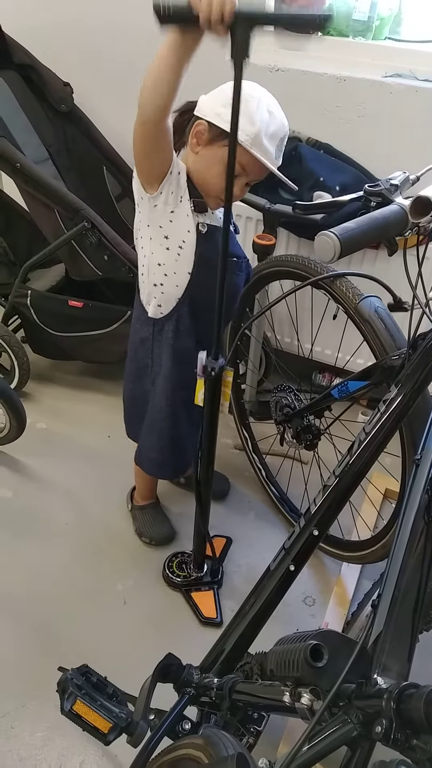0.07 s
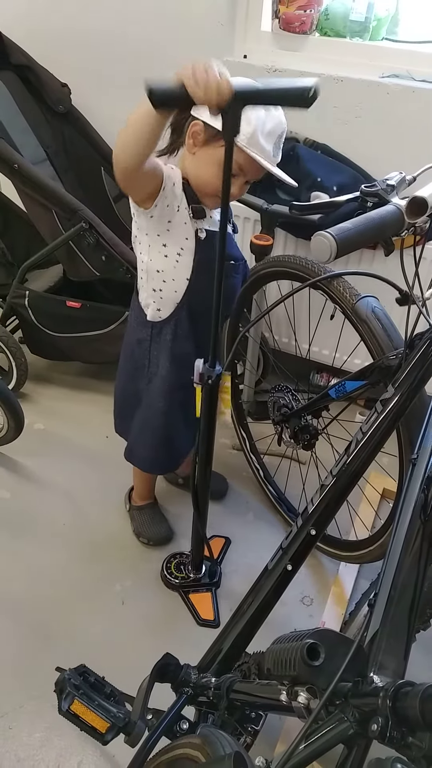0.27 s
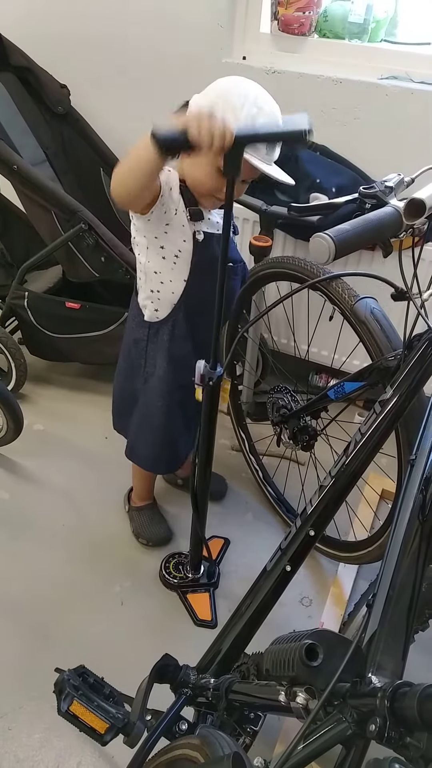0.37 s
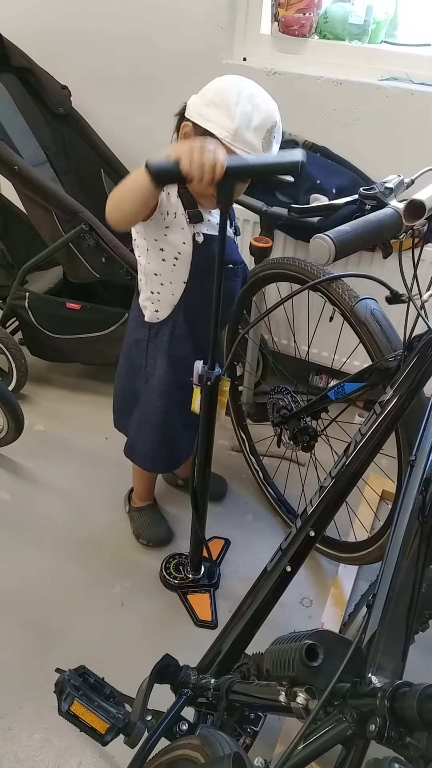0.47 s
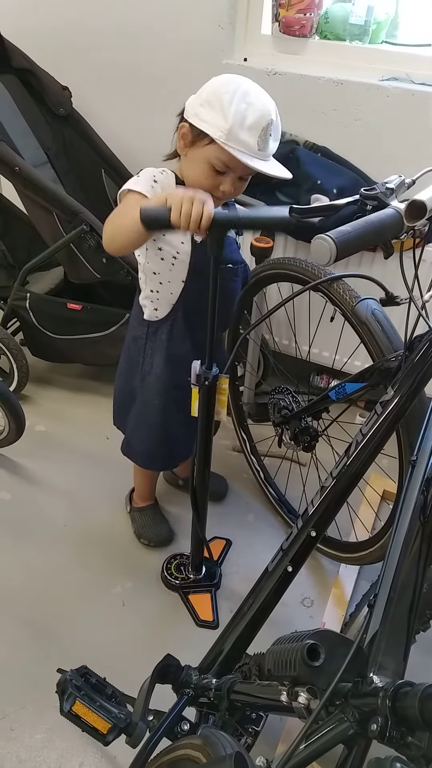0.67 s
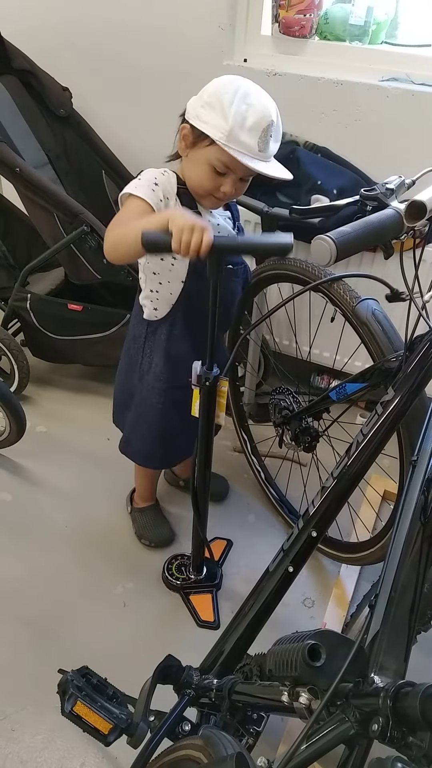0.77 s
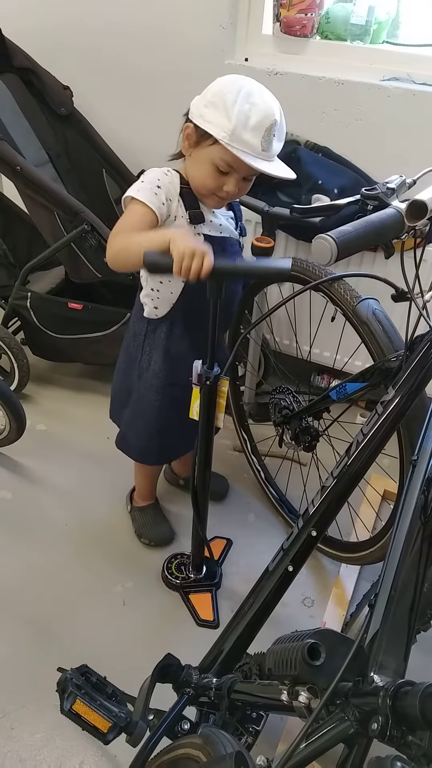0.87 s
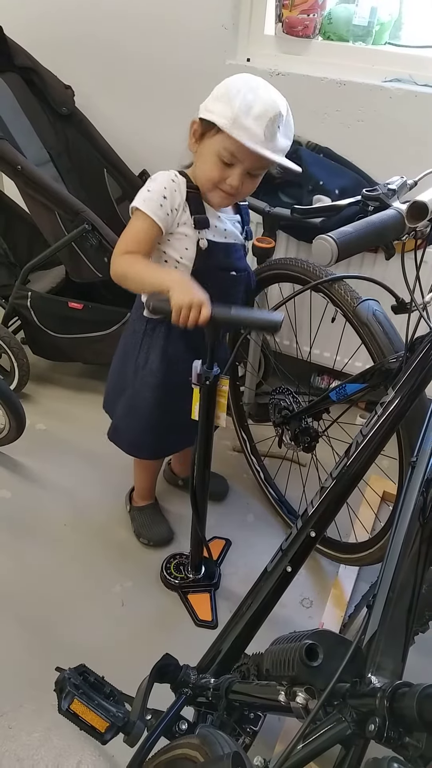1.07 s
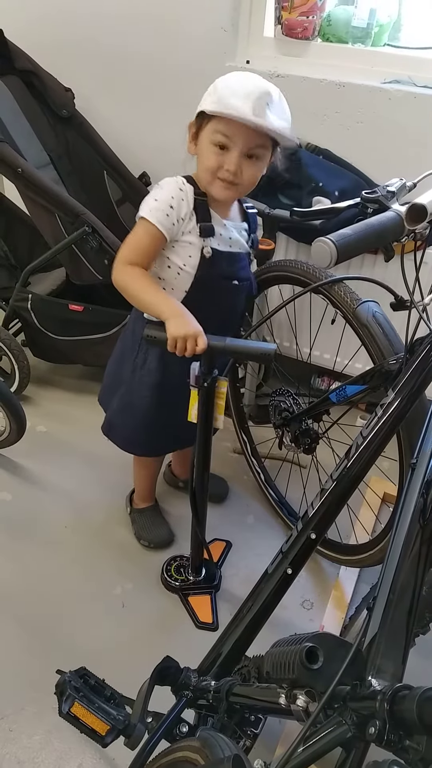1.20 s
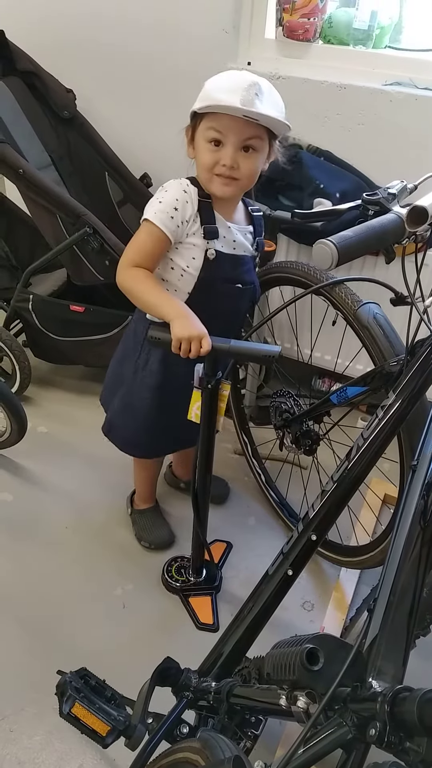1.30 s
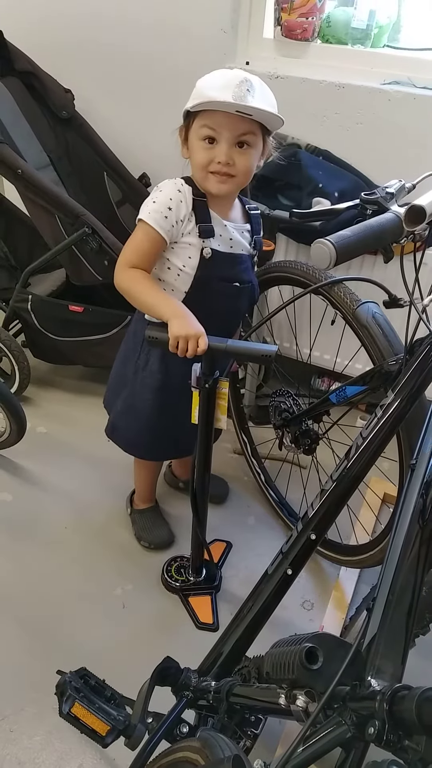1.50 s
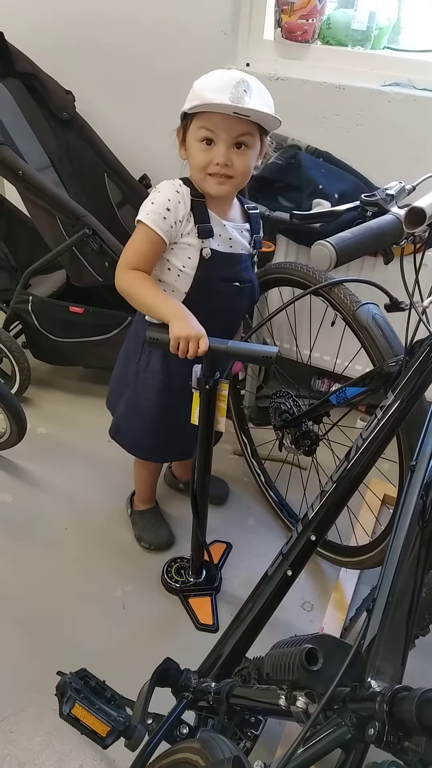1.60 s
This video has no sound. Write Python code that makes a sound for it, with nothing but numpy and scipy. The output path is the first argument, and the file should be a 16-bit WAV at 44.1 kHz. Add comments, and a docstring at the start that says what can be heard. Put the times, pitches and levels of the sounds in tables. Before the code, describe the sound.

One slow bicycle pump downstroke: bright airy hiss, loose rod clatter early, soft landing at the end

```python
"""Air hisses on the right for one slow downstroke of a floor bicycle pump in a small hard-walled room.
The hiss is shaped noise with faint whistles; mostly early on, the loose rod knocks as struck modes
and clatter in the ringing barrel. The sliding piston rubs as rough noise and hums as a gliding sine,
over a low noise rumble and dull noise thuds, the last as the piston lands softly."""
import sys
import numpy as np
from scipy import signal
from scipy.fft import rfft, irfft
from scipy.io import wavfile

SR = 44100
rng = np.random.default_rng(int(sys.argv[2]) if len(sys.argv) > 2 else 0)


def unload_audio(sound):
    """Save the sound as a 16-bit wav file, at the path given as the first command line argument."""
    columns = np.transpose(np.atleast_2d(sound))
    # keep every value between -1 and 1, then stretch to whole-number steps
    steps = np.round(np.clip(columns, -1, 1) * 32767)
    wavfile.write(sys.argv[1], SR, steps.astype(np.int16))


N = 72765
T = np.arange(N) / SR  # time [s]


def from_db(db):
    """Decibels to gain."""
    return 10 ** (np.asarray(db) / 20)


def rms_one(x):
    """Scale each channel to rms 1."""
    return x / np.sqrt(np.mean(x ** 2, axis=-1, keepdims=True) + 1e-20)


def in_time(rows):
    """Join the rows of a curve by straight lines."""
    s, *columns = np.transpose(rows)
    return [np.interp(T, s, c) for c in columns]


def level(rows):
    """Gain of a level curve."""
    return from_db(in_time(rows)[0])


def during(rows):
    """Gate that is open between the first and last times of a curve."""
    return (T > rows[0][0]) * (T < rows[-1][0])


def pan(db):
    """Left and right gains for a left-minus-right level difference."""
    return from_db(np.array([[db], [-db]]) / 2)


def coloured(spectrum):
    """Noise with the given spectrum, rolled off beyond its ends, rms 1."""
    hz, db = np.transpose(spectrum)
    f = np.maximum(np.arange(N // 2 + 1) * SR / N, 1)
    gain = from_db(np.interp(np.log(f), np.log(hz), db))
    above = 1 + (f / (2 * hz[-1])) ** 6
    below = 1 + (hz[0] / (2 * f)) ** 6
    gain /= np.sqrt(above * below)
    return rms_one(irfft(rfft(rng.standard_normal(N)) * gain, N))


def stereo_noise(spectrum, likeness):
    """Two channels of noise that share a part: likeness 0 is separate, 1 is identical."""
    shared = coloured(spectrum)
    separate = np.array([coloured(spectrum), coloured(spectrum)])
    return np.sqrt(likeness) * shared + np.sqrt(1 - likeness) * separate


def drift(hz):
    """Slow random motion, spread 1: noise through a two-pole lowpass that has already settled."""
    r = np.exp(-2 * np.pi * hz / SR)
    return rms_one(signal.lfilter([1], [1, -2 * r, r * r], rng.standard_normal(2 * N))[N:])


def dying(start, t60):
    """Envelope that jumps to 1 and falls 60 dB in t60 seconds."""
    return (T >= start) * np.exp(-np.log(1000) * np.maximum(T - start, 0) / t60)


def ring(start, hz, t60):
    """A struck mode: a sine with a quick rise and an exponential decay."""
    rise_s = .0008
    age = np.maximum(T - start, 0)
    return (1 - np.exp(-age / rise_s)) * dying(start, t60) * np.sin(2 * np.pi * hz * age)


def in_room(x, wet_db):
    """Add a diffuse noise tail, different at each ear, whose top dies sooner."""
    t60_s, treble_t60_s, treble_hz, gap_s = 0.43, .3, 8720, .004
    white = rng.standard_normal((2, N))
    low = signal.sosfilt(signal.butter(6, treble_hz, "low", fs=SR, output="sos"), white)
    high = signal.sosfilt(signal.butter(6, treble_hz, "high", fs=SR, output="sos"), white)
    decay = dying(gap_s, t60_s)
    tail = low * decay + high * dying(gap_s, treble_t60_s)
    tail /= np.sqrt(np.sum(decay ** 2))
    return x + from_db(wet_db) * signal.fftconvolve(x, tail, axes=-1)[:, :N]


def rumble():
    """Low noise from the pump's body lies under the stroke."""
    # rumble of the body: (time [s], level [dB])
    rumble_curve = [(.06, -100), (.11, -85), (.22, -81), (.3, -60), (.72, -69), (.85, -60.5), (1.0, -60.5),
                    (1.2, -68), (1.38, -58), (1.48, -70.5), (1.65, -84)]
    # its spectrum: (frequency [Hz], relative density [dB per Hz])
    rumble_spectrum = [(30, -30), (70, -34), (110, -3.5), (150, -1), (220, -11.5), (400, 1.5), (700, -19.5)]
    started = T > rumble_curve[0][0]
    return level(rumble_curve) * started * stereo_noise(rumble_spectrum, likeness=0.86)


def bumps():
    """Dull noise thuds swell and die as the foot rocks on the floor and the piston lands."""
    # bumps of the pump's foot: (time [s], level [dB])
    thuds = [(.25, -60), (.285, -50), (.47, -51), (.65, -57), (1.073, -52), (1.293, -46), (1.335, -58)]
    # their spectrum: (frequency [Hz], relative density [dB per Hz])
    thud_spectrum = [(25, -19.5), (65, -19.5), (115, -6.5), (180, -1.5), (280, -20), (600, -28.5)]
    attack_s, t60_s = 0.017, 0.18
    envelope = 0
    for s, db in thuds:
        attack = np.clip((T - s) / attack_s, 0, 1)
        envelope = envelope + from_db(db) * attack * dying(s, t60_s)
    return envelope * stereo_noise(thud_spectrum, likeness=0.8)


def hum():
    """The sliding piston hums: one sine glides in pitch while its level and pitch waver."""
    # hum: (time [s], pitch [Hz], level [dB])
    hum_curve = [(.58, 354, -62), (.65, 342.9, -66.5), (.72, 330.4, -60), (.79, 340.4, -59),
                 (.87, 273.7, -73), (.97, 278.8, -59.5), (1.08, 322.7, -67), (1.16, 341, -59),
                 (1.21, 367, -56), (1.27, 373.8, -45.5), (1.31, 374.8, -56.5), (1.36, 385, -60)]
    flicker_db, flicker_hz = 2.5, 14
    hz, db = in_time(hum_curve)
    loudness = from_db(db + flicker_db * drift(flicker_hz))
    wavering_hz = hz * (1 + 0.0099 * drift(30))
    tone = np.sqrt(2) * np.sin(2 * np.pi * np.cumsum(wavering_hz) / SR)  # rms 1
    return loudness * tone * during(hum_curve) * pan(1.2)


def rub():
    """The seal rubs down the barrel: nearly mono noise, a little to the right."""
    # rubbing: (time [s], level [dB])
    rub_curve = [(.06, -101.5), (.13, -69), (.228, -52.5), (.245, -38), (.33, -37.5), (.4, -34),
                 (.52, -37.5), (.57, -45.5), (.7, -48.5), (.9, -52.5), (1.1, -50), (1.23, -45.5),
                 (1.3, -42), (1.37, -48.5), (1.45, -64), (1.65, -105)]
    # its spectrum: (frequency [Hz], relative density [dB per Hz])
    rub_spectrum = [(30, -32.5), (65, -44), (120, -12), (200, -14.5), (330, -11), (450, -4), (590, 1.5),
                    (750, -0.5), (1000, 0), (1400, -1.5), (1850, -6.5), (2400, -1.5), (3500, -2),
                    (6000, -23)]
    return level(rub_curve) * stereo_noise(rub_spectrum, likeness=0.99) * pan(-3)


def scrape():
    """The rod scrapes in its guide: bright, wide noise."""
    # scraping: (time [s], level [dB])
    scrape_curve = [(.1, -79), (.25, -41), (.34, -33.5), (.38, -35), (.5, -37), (.57, -38), (.7, -70),
                    (.95, -60), (1.15, -53), (1.29, -39.5), (1.38, -60), (1.45, -79.5)]
    # its spectrum: (frequency [Hz], relative density [dB per Hz])
    scrape_spectrum = [(1500, 5.5), (2500, -26), (5000, 10.5), (7400, 4), (8400, -7), (10500, -8.5),
                       (13000, -31), (15800, -37.5)]
    return level(scrape_curve) * stereo_noise(scrape_spectrum, likeness=0.18) * during(scrape_curve)


def piston():
    """Rubbing and scraping share one uneven grip; the hum runs free of it."""
    rough_db, rough_hz = 1, 60
    grip = from_db(rough_db * drift(rough_hz))
    return grip * (rub() + scrape()) + hum()


def off_axis(x):
    """The sound reaches the right ear a little later."""
    lag_s = .0001
    return np.array([x[0], np.interp(T - lag_s, T, x[1])])


def knocks():
    """Each knock stirs the modes near its brightest pitch, a brief clatter and the barrel's ring."""
    # knocks of the rod in the barrel: (time [s], relative level of modes and clatter [dB],
    # brightest pitch [Hz], spread [octaves], barrel ring [dB], left minus right [dB])
    hits = [(.237, -25.5, 1400, 0.48, -58, -4), (0.238, -27.5, 590, 0.21, -57, -2),
            (.259, -24.5, 1450, 0.54, -44, -0.5), (.335, -16, 560, 0.12, -58, 5),
            (.339, -17.5, 1630, .12, -61.5, 5), (.3725, -13.5, 1557, 0.61, -22, 4),
            (.381, -22, 620, .4, -49, 4), (0.398, -18.5, 1660, 0.15, -57.5, 4.5),
            (.413, -21, 1880, 0.72, -30.5, 5.5), (.432, -26, 1690, 0.69, -54, 13.5),
            (.464, -13.5, 2500, 0.77, -40.5, -2), (.484, -19, 1650, 0.68, -57, 8.5),
            (.488, -14.5, 1540, 0.38, -35.5, 8), (.511, -19.5, 1650, 0.59, -42.5, 6.5),
            (1.306, -30, 1350, 0.17, -66, -8)]
    # short modes of rod and guide: (frequency [Hz], relative level [dB], t60 [s])
    rod_modes = [(575, -1, 0.036), (616, -2, 0.05), (870, -27, 0.14), (964, -6, 0.21), (1170, -8, 0.023),
                 (1363, -1.5, 0.036), (1524, -10.5, 0.044), (1680, -14, 0.11), (1770, -11, 0.047),
                 (2240, -13, .06), (2650, -7, 0.062), (2800, -10, 0.034)]
    # the barrel's beating pair and a weaker mode below: (frequency [Hz], relative level [dB], t60 [s])
    barrel_modes = [(1023, 0, 0.35), (1041, -2.5, 0.24), (958, -19, 0.69)]
    # clatter before its band filter: (frequency [Hz], relative density [dB per Hz])
    clatter_spectrum = [(100, -19), (300, -12.5), (550, -9), (1300, 9.5), (2700, 6), (4000, -19),
                        (8000, -29.5), (15000, -43)]
    modes_db, clatter_db, clatter_t60_s = -2.5, -10.5, 0.087
    contact_s = 0.002014  # a knock is a brief judder, not one clean touch
    mode_scatter = 0.22  # how much a mode's strength differs between knocks and between ears
    waver_db, waver_hz, low_cut_hz = 0.7, 40.2, 450

    out = np.zeros((2, N))
    waver = from_db(waver_db * drift(waver_hz))
    for s, db, hz, octaves, ring_db, side_db in hits:
        body = 0
        for f, mode_db, t60 in rod_modes:
            nearness = np.exp(-.5 * (np.log2(f / hz) / octaves) ** 2)
            strength = from_db(mode_db) * nearness * rng.normal(1, mode_scatter, (2, 1))
            body = body + strength * ring(s + contact_s * rng.random(), f, t60)

        near = signal.butter(1, [hz / 1.55, hz * 1.53], "band", fs=SR, output="sos")
        rattle = signal.sosfilt(near, stereo_noise(clatter_spectrum, likeness=0.44))
        clatter = rms_one(rattle) * dying(s, clatter_t60_s)

        barrel = waver * sum(from_db(ring_db + mode_db) * ring(s, f, t60) for f, mode_db, t60 in barrel_modes)
        contact = from_db(db) * (from_db(modes_db) * body + from_db(clatter_db) * clatter)
        out += pan(side_db) * (contact + barrel)
    low_cut = signal.butter(2, low_cut_hz, "high", fs=SR, output="sos")
    return off_axis(signal.sosfilt(low_cut, out))


def whistles():
    """Narrow wavering tones come and go in the jet: two drifting quadrature parts make each."""
    # faint whistles at the valve: (start [s], length [s], pitch [Hz], relative level [dB])
    tones = [(.4, 0.11, 6340, -32), (0.686, 0.082, 4370, -28.5), (.87, 0.17, 6900, -36)]
    width_hz = 45
    out = 0
    for s, length, hz, db in tones:
        swell = np.sin(np.pi * np.clip((T - s) / length, 0, 1))
        phase = 2 * np.pi * hz * T
        tone = drift(width_hz) * np.sin(phase) + drift(width_hz) * np.cos(phase)
        out = out + from_db(db) * swell * tone
    return out


def air_jet():
    """Turbulent air leaves the valve head as fluttering noise; the hiss deepens late in the stroke."""
    # air flow, as level of the hiss: (time [s], level [dB])
    flow_curve = [(.06, -91.5), (.1, -67.5), (.125, -53), (.204, -27.5), (.265, -19.5), (.39, -22.5),
                  (.5, -19.5), (.65, -20), (.76, -20.5), (.83, -21), (.89, -20), (.93, -24), (1.09, -23.5),
                  (1.16, -22.5), (1.29, -21), (1.35, -24.5), (1.41, -38.5), (1.5, -75)]
    # treble, over 8 kHz, against the main hiss: (time [s], level [dB])
    treble_curve = [(.1, -19), (.25, -18), (.45, -16.5), (.6, -16.5), (.75, -22), (.95, -22.5),
                    (1.12, -19.5), (1.3, -22), (1.42, -22.5)]
    # lower hiss, 2.5-4 kHz, against the main hiss: (time [s], level [dB])
    lower_curve = [(.1, -10), (.25, -15), (.47, -16.5), (.58, -24), (.72, -22.5), (.82, -16.5), (.9, -17),
                   (1.08, -11.5), (1.3, -12.5)]
    # spectra of the main hiss at each ear, treble and lower hiss:
    # (frequency [Hz], relative density [dB per Hz])
    left_spectrum = [(2500, -22), (3700, -2.5), (4400, -0.5), (5600, -1.5), (6800, -2.5), (7600, -3.5),
                     (8300, -24), (10500, -21), (12500, -36), (15800, -49.5)]
    right_spectrum = [(2500, -46), (3700, -31), (4250, -10.5), (5200, -6.5), (6000, -4.5), (6700, -1),
                      (7650, -5.5), (8100, -13), (8600, -29), (11000, -37), (15800, -51.5)]
    treble_spectrum = [(7000, -19.5), (8200, -6.5), (9000, 0), (11000, -2.5), (12800, -10), (15800, -10.5)]
    lower_spectrum = [(1500, -40), (2200, -11), (2900, 2), (3600, 2.5), (4100, 7.5), (5000, -36)]
    flutter_db, flutter_hz, sputter_db, sputter_hz = 0.53, 25, .5, 200
    left_db, lower_left_db = -25, -18.5  # left ear against right

    unsteadiness = from_db(flutter_db * drift(flutter_hz) + sputter_db * drift(sputter_hz))
    flow = level(flow_curve) * unsteadiness
    main = np.array([coloured(left_spectrum), coloured(right_spectrum)])
    treble = level(treble_curve) * stereo_noise(treble_spectrum, likeness=.1)
    lower = level(lower_curve) * stereo_noise(lower_spectrum, likeness=0.33)
    upper_jet = (flow * (main + treble) + whistles()) * from_db([[left_db], [0]])
    return upper_jet + flow * lower * from_db([[lower_left_db], [0]])


def scene():
    """Rumble, bumps, piston, knocks and air, each with its own share of the room."""
    floor = in_room(rumble() + bumps(), wet_db=-16)
    sliding = in_room(piston(), wet_db=-5.5)
    knocking = in_room(knocks(), wet_db=-7.5)
    air = in_room(air_jet(), wet_db=-5.5)
    return floor + sliding + knocking + air


def record(dry):
    """An elliptic lowpass cuts the top steeply."""
    cutoff_hz = 15900
    return signal.sosfilt(signal.ellip(12, .1, 80, cutoff_hz, fs=SR, output="sos"), dry)


dry = scene()
out = record(dry)
unload_audio(out)
```